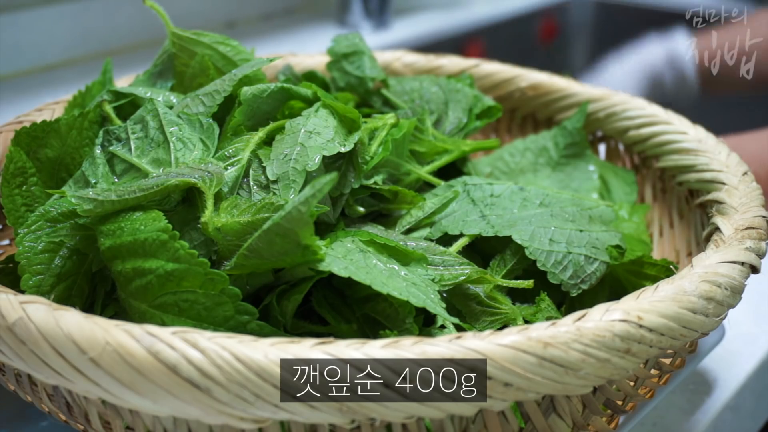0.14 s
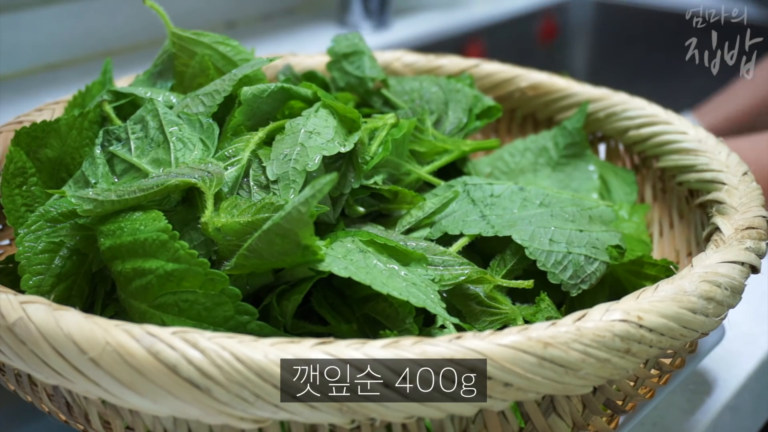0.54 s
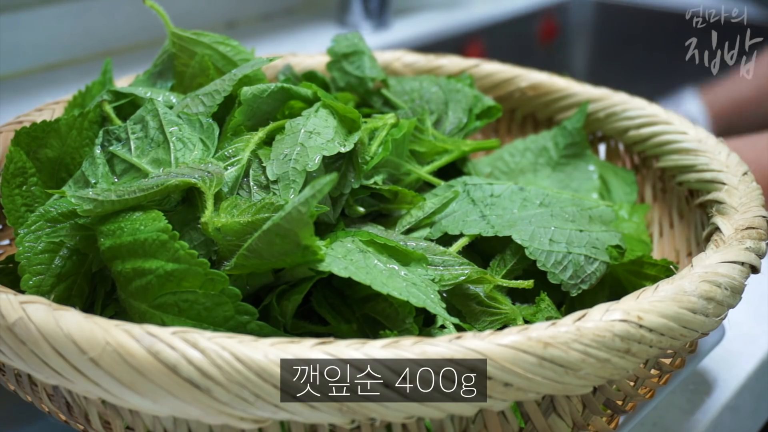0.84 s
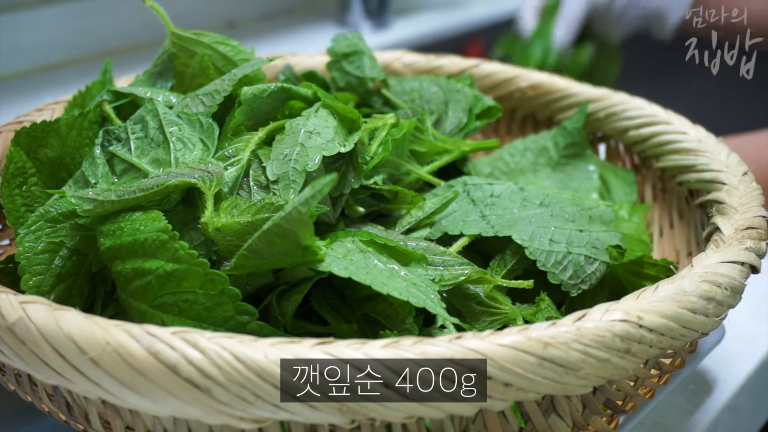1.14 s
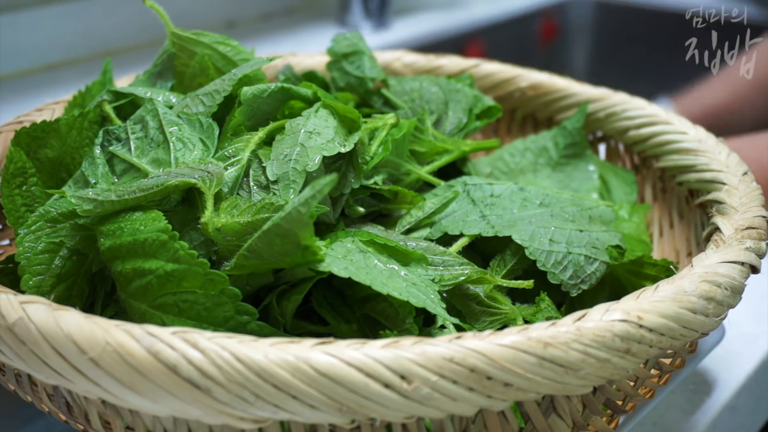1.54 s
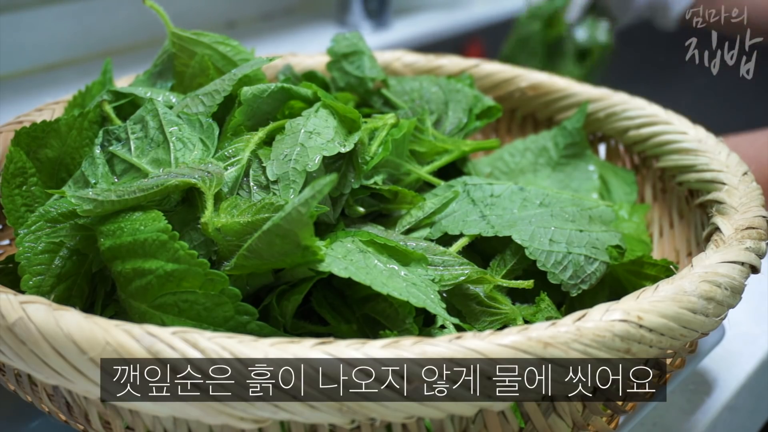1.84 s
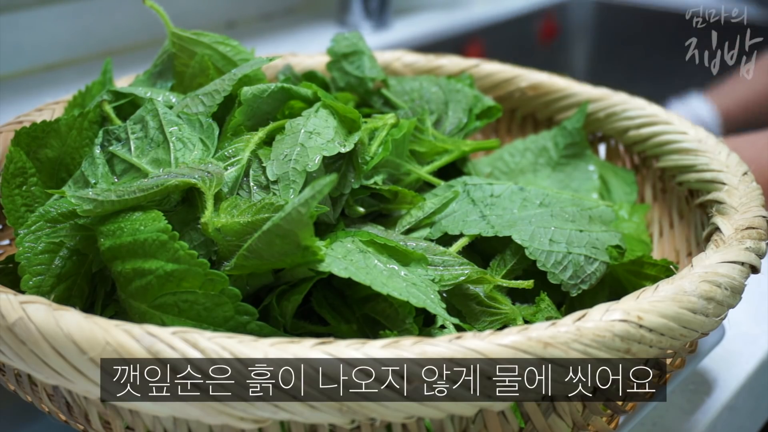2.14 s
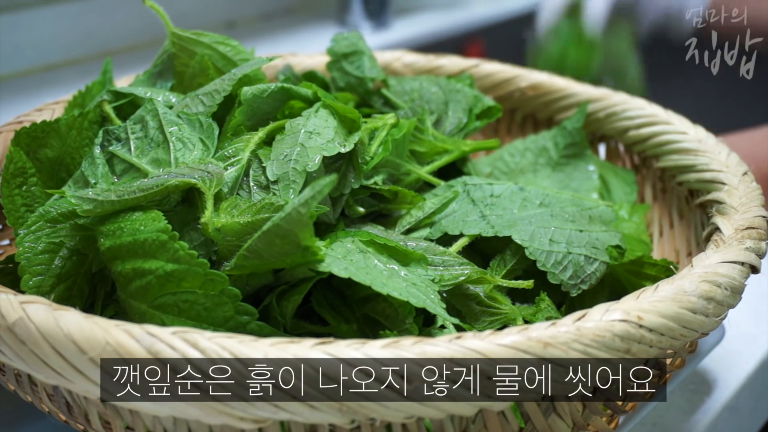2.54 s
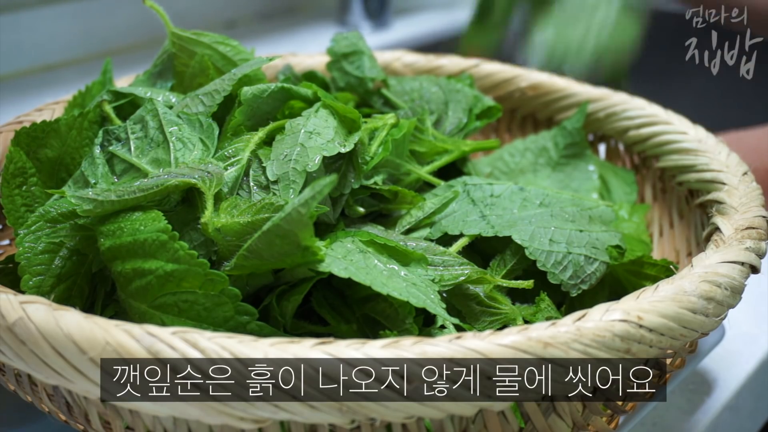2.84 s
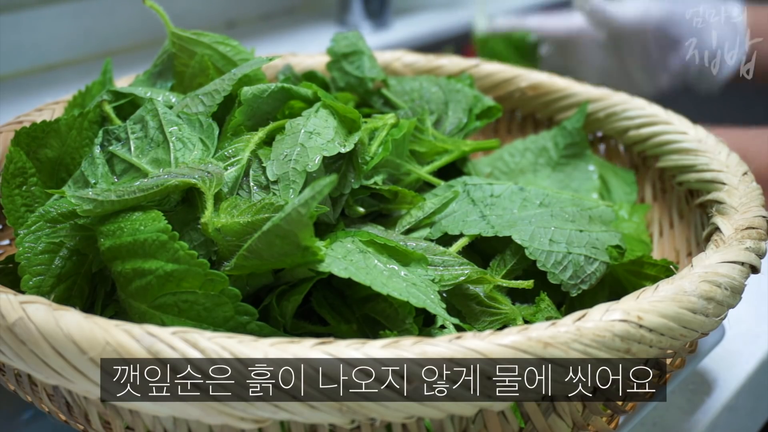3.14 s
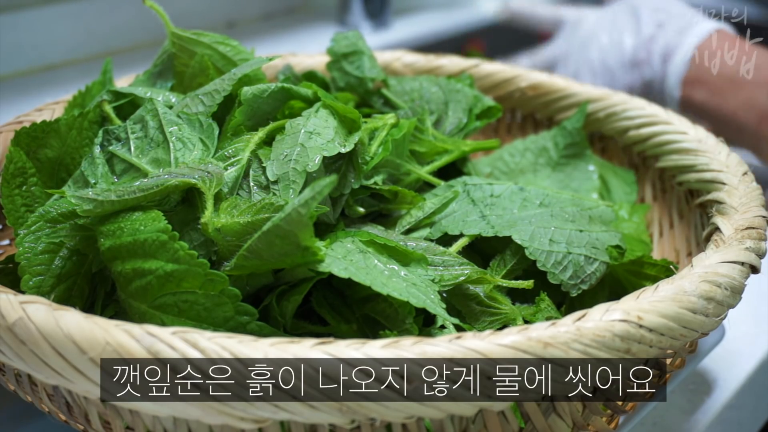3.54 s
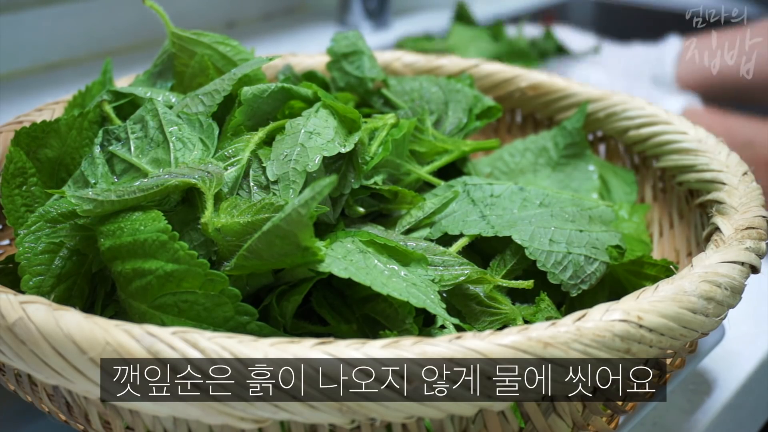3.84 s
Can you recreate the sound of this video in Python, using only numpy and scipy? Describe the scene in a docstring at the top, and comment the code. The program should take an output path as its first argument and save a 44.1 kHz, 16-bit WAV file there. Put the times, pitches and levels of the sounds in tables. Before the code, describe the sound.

Water sloshes and splashes as a hand swishes leafy greens in a sink, with bubbly plops and drips, busiest early and again past two seconds, then calming; close stereo pickup in a hard, echoing kitchen.

```python
"""Leaves swished in a sink

A hand swishes leaves in a basin of water in a kitchen sink and lifts them out, dripping.
Strokes swell three clouds of ringing bubbles and a leafy crackle; splashes are bursts of dense droplets.
Large bubbles and drips plop as single rising rings; gulps are patter through gliding resonances.
Sink walls and hard kitchen echo the water, over dull basin knocks and a faint steady drone."""
import sys
import numpy as np
from scipy import signal
from scipy.fft import rfft, irfft
from scipy.io import wavfile
from scipy.ndimage import uniform_filter1d

SR = 44100
rng = np.random.default_rng(int(sys.argv[2]) if len(sys.argv) > 2 else 0)


def transcribe(u):
    """Save the signal u as a 16-bit wav file named by the first command-line argument.

    u: samples, shape (n,) or (channels, n), limited to [-1, 1]; the rate is SR.
    q: integer samples, one column per channel.
    """
    v = np.clip(np.atleast_2d(u).T, -1, 1)
    q = np.round(v * 32767).astype(np.int16)
    wavfile.write(sys.argv[1], SR, q)


N = 176400  # samples, 4 s

# tone of the kitchen background, with its droning resonances: f/Hz, level/dB
AIR_TONE = [(20, -48), (60, -39), (140, -19.5), (240, -11), (330, 0), (480, -11), (550, -8), (630, 8.5),
            (700, -7), (790, -5.5), (1000, -17), (2500, -2), (5000, -9), (11000, -13.5)]
# soft knocks of the hand on the basin: t/s, level/dB
BASIN_KNOCKS = [(.085, -66), (1.44, -69), (3.46, -67)]
# decay time of the kitchen echo: f/Hz, t60/s
ROOM_DECAY = [(200, 0.62), (1000, 0.51), (2800, 0.63), (7000, 0.32), (11000, 0.54)]
# tone of the side signal: f/Hz, level/dB
SIDE_TONE = [(50, -9), (300, -9.5), (700, -10.5), (1400, -10), (2800, -8.5), (5500, -18.5), (10000, -26)]
# distinct echoes off the sink walls: delay/s, gain/ratio
WALL_ECHOES = [(.0031, 0.58), (.0055, 0.52), (.0094, 0.67), (.0137, .35)]
# air pockets that shrink or open under the hand: start t/s, length/s, first f/Hz, last f/Hz, level/dB
AIR_POCKETS = [(0.681, 0.098, 1290, 1080, -44.5), (1.002, 0.1, 910, 2020, -48.5),
               (2.383, 0.088, 497, 1390, -38), (2.549, 0.16, 1370, 1450, -46)]
# single bubbles and drips: t/s, starting f/Hz, level/dB, ring t60/s
SINGLE_BUBBLES = [(.001, 1570, -24.5, 0.013), (.017, 2080, -29.5, 0.015), (.055, 4320, -26.5, 0.011),
                  (.166, 3630, -20.5, 0.0044), (.2165, 1560, -27.5, 0.018), (.239, 1485, -15.5, 0.007),
                  (.312, 2740, -25, 0.014), (.318, 770, -10.5, 0.023), (.336, 3650, -27, .011),
                  (.354, 1480, -8.5, 0.0079), (.360, 1026, -11.5, 0.015), (.455, 1835, -17.5, 0.016),
                  (.459, 7400, -14.5, 0.0028), (0.513, 2784, -19.5, 0.0085), (.513, 860, -26.5, 0.021),
                  (0.529, 1670, -16.5, 0.017), (0.5704, 1474, -10, 0.017), (0.579, 1644, -14.5, 0.024),
                  (.617, 1290, -20.5, 0.0099), (0.678, 2740, -28, 0.0087), (0.696, 1200, -22, 0.015),
                  (.761, 6330, -22, 0.0036), (.808, 665, -40, 0.015), (.8595, 2130, -18.5, 0.008),
                  (.910, 3400, -21, 0.01), (0.918, 4130, -15, 0.0051), (.995, 860, -28, 0.033),
                  (1.025, 4800, -27.5, 0.0076), (1.051, 1770, -30, 0.0097), (1.06, 9350, -26, 0.0058),
                  (1.122, 1797, -11, 0.015), (1.189, 2200, -23, 0.0088), (1.212, 4100, -19.5, 0.0088),
                  (1.249, 6050, -18.5, 0.0064), (1.252, 4320, -17.5, 0.0066), (1.264, 2470, -9.5, 0.0046),
                  (1.397, 1150, -23, .012), (1.418, 743, -9, 0.025), (1.424, 858, -14, 0.02),
                  (1.508, 4540, -11.5, 0.002), (1.597, 756, -33, 0.011), (1.649, 2550, -22, 0.0097),
                  (1.945, 5600, -19, 0.0044), (2.073, 1840, -16, 0.0095), (2.135, 1367, -12.5, 0.017),
                  (2.156, 1370, -22.5, 0.038), (2.195, 754, -12, 0.0053), (2.323, 2550, -25.5, 0.011),
                  (2.389, 584, -25, 0.033), (2.437, 5600, -28.5, .005), (2.457, 1180, -31.5, 0.03),
                  (2.469, 1830, -33.5, 0.013), (2.481, 5670, -30, 0.0082), (2.543, 1410, -22, .02),
                  (2.632, 2820, -33, 0.011), (2.674, 1400, -27.5, 0.032), (2.697, 1490, -24.5, .02),
                  (2.728, 4460, -21, 0.0083), (2.842, 3420, -19.5, .008), (2.851, 7800, -34, 0.0062),
                  (2.9535, 2800, -11.5, 0.009), (2.9916, 3160, -12.5, 0.0063), (3.001, 3080, -21, 0.0084),
                  (3.172, 8300, -28, 0.0042), (3.213, 5640, -27.5, 0.0051), (3.287, 5070, -25.5, 0.0092),
                  (3.343, 5200, -22, 0.0042), (3.501, 1930, -22.5, .011), (3.511, 2200, -31, .008),
                  (3.579, 1530, -33.5, 0.015), (3.594, 5130, -30, .006), (3.777, 2240, -29, 0.0099),
                  (3.8075, 3620, -25.5, 0.0054), (3.874, 3840, -32.5, .007), (3.906, 3140, -25.5, 0.0044)]
# splashes: crest t/s, rise/s, fall/s, body level/dB, spray level/dB
SPLASH_EVENTS = [(.094, 0.0047, 0.0047, -52, -35.5), (0.348, 0.014, 0.0068, -28, -31),
                 (0.351, .0005, 0.00084, -32, -15), (0.419, 0.015, 0.0088, -47, -33.5),
                 (.463, 0.013, 0.0083, -48, -35), (.513, 0.0014, 0.0064, -26.5, -29.5),
                 (0.917, 0.018, 0.018, -69, -32.5), (1.124, 0.0027, 0.0081, -47, -35),
                 (1.251, 0.0011, 0.0083, -44, -24), (1.265, .002, .014, -35.5, -30),
                 (1.281, 0.0059, 0.045, -30.5, -44), (1.430, 0.0096, 0.0037, -25, -31.5),
                 (1.628, 0.0056, 0.027, -41, -36.5), (1.941, .001, 0.019, -65, -31),
                 (1.995, .002, 0.023, -41.5, -33), (2.079, 0.0031, 0.004, -26.5, -39),
                 (2.137, 0.0049, 0.0042, -27, -29), (2.202, 0.0065, .008, -35, -30),
                 (2.731, 0.02, 0.026, -27.5, -38), (2.88, 0.0097, 0.01, -38.5, -27),
                 (2.907, 0.011, 0.014, -54, -27.5), (3.427, 0.0017, 0.011, -46, -35),
                 (3.466, 0.0035, 0.0084, -46, -30), (3.597, 0.0062, 0.018, -62, -42),
                 (3.909, .001, 0.012, -52, -43.5)]
# tone of a splash's low body: f/Hz, level/dB
BODY_TONE = [(30, -50), (150, -47), (300, -10.5), (500, -21.5), (700, 2), (1000, 4.5), (1600, -1.5),
             (2800, -4), (5000, -4), (11000, -44)]
# tone of a splash's bright spray: f/Hz, level/dB
SPRAY_TONE = [(30, -61), (500, -33), (1500, 0), (3000, 3.5), (5000, 0), (8000, -0.5), (11000, -6)]
# swells of the stirred water, before each cloud's gain: t/s, gurgle level/dB, babble level/dB, fizz level/dB
STROKE_LEVELS = [(0.0, -57.5, -43, -42.5), (0.14, -55, -63, -48.5), (0.22, -48.5, -47.5, -43),
                 (0.298, -45, -41, -41), (0.36, -46, -39, -38), (0.47, -44, -42.5, -43),
                 (0.54, -47, -36.5, -36.5), (0.65, -49, -43, -48), (0.71, -51, -40, -43.5),
                 (0.78, -44, -51, -47), (0.88, -43, -50, -41), (0.94, -51, -43.5, -43),
                 (1.0, -44.5, -43.5, -40), (1.101, -50, -32.5, -42.5), (1.22, -58, -47.5, -41),
                 (1.29, -39, -35, -37.5), (1.4, -35.5, -32, -39.5), (1.48, -49, -42, -45),
                 (1.58, -44, -45, -46.5), (1.66, -52.5, -41.5, -50), (1.8, -53.5, -52.5, -49),
                 (1.86, -49, -40, -43.5), (1.93, -59, -53, -45.5), (2.01, -49, -33.5, -32.5),
                 (2.12, -50, -36.5, -43.5), (2.21, -30.5, -35, -41.5), (2.27, -46.5, -42.5, -53),
                 (2.37, -48.5, -42, -50), (2.45, -44.5, -35.5, -41), (2.53, -58, -46, -45),
                 (2.61, -51, -44, -46.5), (2.69, -80, -37, -35.5), (2.738, -43, -33.5, -39),
                 (2.83, -49.5, -48, -38.5), (2.909, -31.5, -34.5, -52), (2.97, -51, -58, -35),
                 (3.08, -50.5, -56.5, -45.5), (3.25, -54.5, -51.5, -46.5), (3.35, -49.5, -48.5, -41.5),
                 (3.41, -58, -51, -48.5), (3.5, -47, -51, -44), (3.6, -54.5, -52, -55),
                 (3.72, -55.5, -72, -52), (4.0, -58.5, -78, -55)]
# bubble clouds, one per level column above:
# lowest f/Hz, highest f/Hz, rate/(bubbles per s), ring/cycles, size spread/dB, gain/dB
BUBBLE_CLOUDS = [(572, 1022, 300, 8.1, 3.5, -6), (1210, 2860, 1000, 11.1, 3, -1.5),
                 (2882, 9740, 800, 24, 5, -4)]
# tone of the crackling leaves: f/Hz, level/dB
RUSTLE_TONE = [(30, -60), (200, -50), (330, 3), (700, -18.5), (1500, 12.5), (3000, -5.5), (5000, 9),
               (8000, 3.5), (11000, 1)]

AIR_DB = -53
KNOCK_HZ, KNOCK_T60_S = 70, 0.04
STIR_S = 0.07  # the water keeps moving: its echo pattern changes this often
SINK_T60_S, ROOM_DELAY_S = 0.037, 0.012
SINK_DB, ROOM_DB, DIRECT_DB = -3.5, -5.5, -1.5
GULP_STAGE_WIDTH_HZ = 360  # bandwidth of each of the two resonance stages
GULP_CLICKS_PER_S, GULP_SPREAD_DB = 500, 4
GLIDE = 0.24  # share by which a bubble's pitch rises as it dies
ONSET_CYCLES = 1.24  # time constant of a bubble's soft start
SPLASH_CLICKS_PER_S, SPLASH_SPREAD_DB = 7000, 4
RUSTLE_CLICKS_PER_S, RUSTLE_SPREAD_DB, RUSTLE_DB = 2500, 0.5, -6
PITCHES_PER_CLOUD = 18
WATER_LOW_HZ = 323  # small bubbles radiate little bass
BUBBLE_LOW_HZ = 560  # the largest bubbles that the basin holds
BALANCE_DB = 0.25  # left raised, right lowered by this much
EDGE_HZ = 11200


def amp(db):
    """Decibels to gain."""
    return 10 ** (np.asarray(db) / 20)


def unit(x):
    """Scales to rms 1."""
    return x / np.sqrt(np.mean(x ** 2) + 1e-20)


def decay(t, t60):
    """Exponential fade that falls by 60 dB in t60 seconds."""
    return np.exp(-np.log(1000) * t / t60)


def read(points, hz):
    """Reads a table on a log-frequency axis."""
    f, value = np.transpose(points)
    return np.interp(np.log(hz + 1), np.log(f + 1), value)


def colour(x, tone):
    """Filters by a table of frequency and level."""
    hz = np.fft.rfftfreq(len(x), 1 / SR)
    return irfft(rfft(x) * amp(read(tone, hz)), len(x))


def highpass(x, hz, order):
    """Removes the bass."""
    return signal.sosfilt(signal.butter(order, hz, "highpass", fs=SR, output="sos"), x)


def add(mix, s, sound):
    """Mixes a sound in at a time in seconds."""
    part = mix[max(round(s * SR), 0):][:len(sound)]
    part += sound[:len(part)]


def clicks(rate, spread_db):
    """Random impulses of either sign, mostly small, a few large."""
    size_db = spread_db * np.minimum(rng.exponential(1, N), 3.5)
    size = amp(size_db) * rng.choice([-1, 1], N)
    return size * (rng.random(N) < rate / SR)


def steadied(x):
    """Evens out the slow chance swells of a cloud, leaving its grain."""
    power = abs(uniform_filter1d(x ** 2, size=2200))  # running mean over about 50 ms
    return x / np.sqrt(power + np.mean(x ** 2) / 20)


def air():
    """Steady noise of the kitchen, coloured with a few faint droning resonances."""
    return amp(AIR_DB) * unit(colour(rng.standard_normal(N), AIR_TONE))


def echo_pattern():
    """A quick flutter in the sink and the longer tail of the kitchen, as sparse decaying echoes."""
    t = np.arange(SR) / SR
    signs = rng.choice([-1., 1.], (2, SR))
    near, far = signs * (rng.random((2, SR)) < 3000 / SR)
    near = near * (t > .001) * decay(t, SINK_T60_S)
    # the kitchen tail fades at its own pace in each frequency band
    hz, s, bands = signal.stft(far * (t > ROOM_DELAY_S), SR, nperseg=256)
    faded = bands * decay(s, read(ROOM_DECAY, hz)[:, None])
    far = signal.istft(faded, SR, nperseg=256)[1][:SR]
    pattern = amp(SINK_DB) * unit(near) + amp(ROOM_DB) * unit(far)
    return (pattern / np.sqrt(SR))[:SR // 2]


def echoes(x, count=4):
    """The sounding spot wanders about the basin, fading round a cycle of echo patterns."""
    place = np.arange(N) / SR / STIR_S
    out = np.zeros(N)
    for k in range(count):
        share = np.sin(np.pi / 2 * np.minimum((place + k) % count, 2))  # up, down, then silent
        out += signal.fftconvolve(x * share, echo_pattern())[:N]
    return out


def knocks():
    """Dull bumps of the basin: low sines that die quickly."""
    t, out = np.arange(0, KNOCK_T60_S, 1 / SR), np.zeros(N)
    bump = np.sin(2 * np.pi * KNOCK_HZ * t) * decay(t, KNOCK_T60_S)
    for s, db in BASIN_KNOCKS:
        add(out, s, amp(db) * bump)
    return out


def resonate(x, hz, width_hz):
    """A resonance that follows the curve hz: shift it to zero, smooth, shift back."""
    turn = np.exp(2j * np.pi * np.cumsum(hz) / SR)
    r = np.exp(-np.pi * width_hz / SR)
    smooth = signal.lfilter([1 - r], [1, -r], x / turn)
    return 2 * (turn * smooth).real


def gulps():
    """Patter rings an air pocket whose pitch glides as its size changes."""
    out = np.zeros(N)
    for s, length, first_hz, last_hz, db in AIR_POCKETS:
        u = np.arange(0, 1, 1 / (length * SR))  # progress through the gulp
        hz = first_hz * (last_hz / first_hz) ** u
        ring = clicks(GULP_CLICKS_PER_S, GULP_SPREAD_DB)[:len(u)]
        for _ in range(2):
            ring = resonate(ring, hz, GULP_STAGE_WIDTH_HZ)
        swell = np.sqrt(abs(np.sin(np.pi * u)))
        add(out, s, amp(db) * swell * unit(ring))
    return out


def bubble(hz, t60):
    """A damped ring whose pitch rises as the bubble nears the surface."""
    t = np.arange(0, t60, 1 / SR)
    turns = hz * (t + GLIDE * t ** 2 / (2 * t60))
    onset = 1 - np.exp(-turns / ONSET_CYCLES)
    return np.sin(2 * np.pi * turns) * decay(t, t60) * onset


def plops():
    """Single bubbles, each thrown back by the near walls of the sink."""
    out = np.zeros(N)
    for s, hz, db, t60 in SINGLE_BUBBLES:
        ring = amp(db) * bubble(hz, t60)
        add(out, s, ring)
        for delay, gain in WALL_ECHOES:
            add(out, s + delay, gain * ring)
    return out


def splashes():
    """Water slaps down: a swell of dense droplets with a low body and a bright spray."""
    t, body, spray = np.arange(N) / SR, np.zeros(N), np.zeros(N)
    for s, rise, fall, body_db, spray_db in SPLASH_EVENTS:
        shape = np.exp(-abs(t - s) / np.where(t < s, rise, fall))
        body += amp(body_db) * shape
        spray += amp(spray_db) * shape
    out = np.zeros(N)
    for level, tone in [(body, BODY_TONE), (spray, SPRAY_TONE)]:
        droplets = clicks(SPLASH_CLICKS_PER_S, SPLASH_SPREAD_DB)
        out += level * unit(colour(droplets, tone))
    return out


def rustle():
    """Crackle of the wet leaves: dense clicks, coloured and evened out."""
    crackle = clicks(RUSTLE_CLICKS_PER_S, RUSTLE_SPREAD_DB)
    return amp(RUSTLE_DB) * steadied(colour(crackle, RUSTLE_TONE))


def bubble_cloud(low_hz, high_hz, rate, cycles, spread_db):
    """Many bubbles at random moments; smaller ones ring higher and die sooner."""
    cloud = np.zeros(N)
    for hz in np.geomspace(low_hz, high_hz, PITCHES_PER_CLOUD):
        starts = clicks(rate / PITCHES_PER_CLOUD, spread_db)
        cloud += signal.oaconvolve(starts, bubble(hz, cycles / hz))[:N]
    return steadied(cloud)


def slosh():
    """Three clouds of bubbles swell with the strokes; wet leaves crackle along with the finest."""
    s, *levels = np.transpose(STROKE_LEVELS)
    t = np.arange(N) / SR
    swells = [amp(np.interp(t, s, level)) for level in levels]
    out = swells[-1] * rustle()
    for swell, (*cloud_settings, db) in zip(swells, BUBBLE_CLOUDS):
        out += swell * amp(db) * bubble_cloud(*cloud_settings)
    return out


def scene():
    """The water is straight ahead; its echoes and the room's air spread to the sides."""
    stirred = highpass(slosh() + splashes() + gulps(), WATER_LOW_HZ, order=2)
    water = stirred + highpass(plops(), BUBBLE_LOW_HZ, order=3)
    mid = amp(DIRECT_DB) * water + echoes(water) + air() + knocks()
    side = colour(echoes(water) + air(), SIDE_TONE)
    left, right = mid + side, mid - side
    return np.array([left * amp(BALANCE_DB), right * amp(-BALANCE_DB)])


def record(dry):
    """The recorder's band limit: a steep low-pass."""
    lowpass = signal.firwin(511, EDGE_HZ, window=("kaiser", 9), fs=SR)
    return signal.oaconvolve(dry, lowpass[None], "same")


dry = scene()
out = record(dry)
transcribe(out)
```